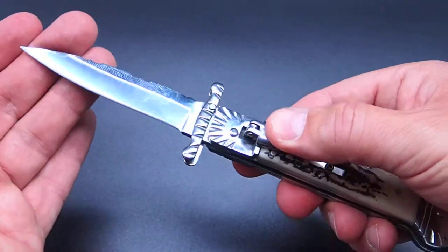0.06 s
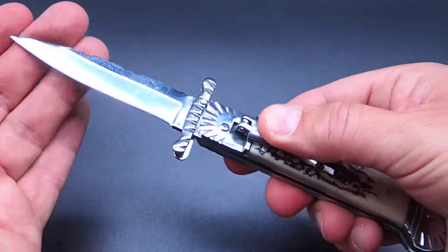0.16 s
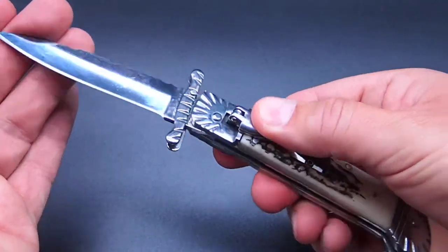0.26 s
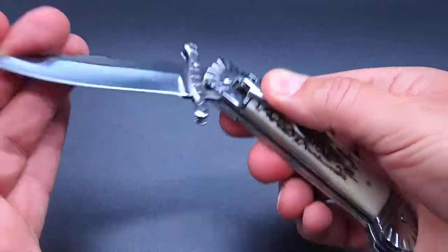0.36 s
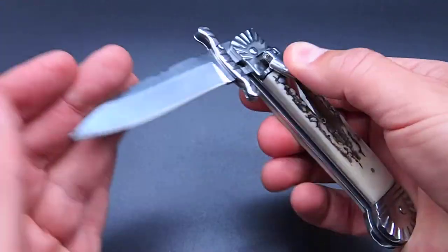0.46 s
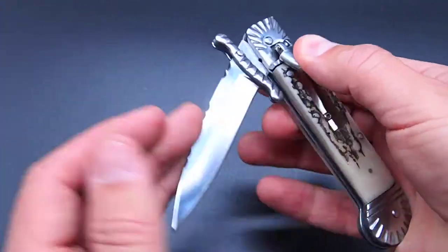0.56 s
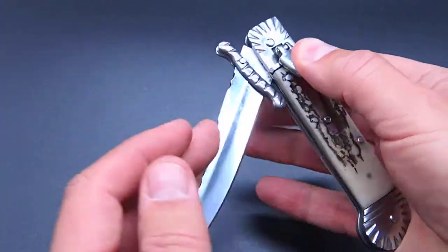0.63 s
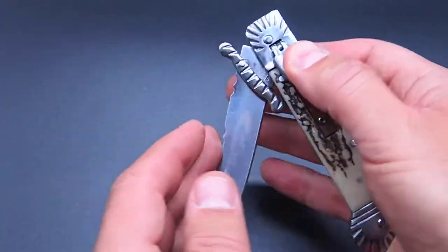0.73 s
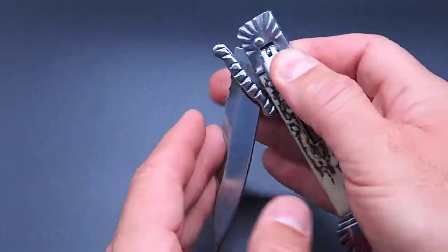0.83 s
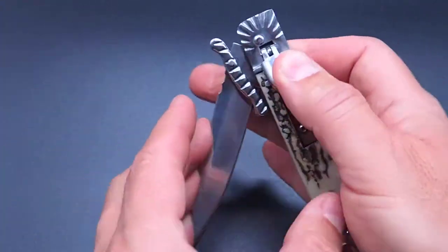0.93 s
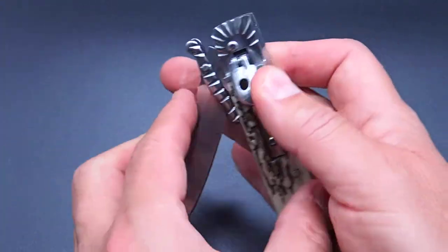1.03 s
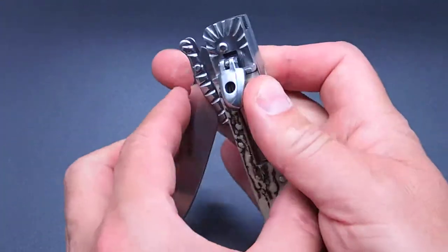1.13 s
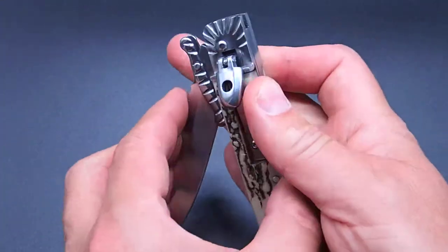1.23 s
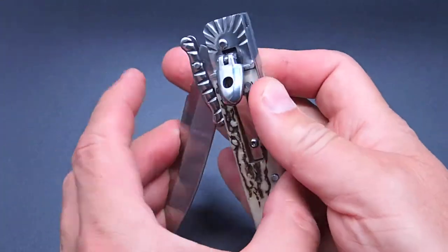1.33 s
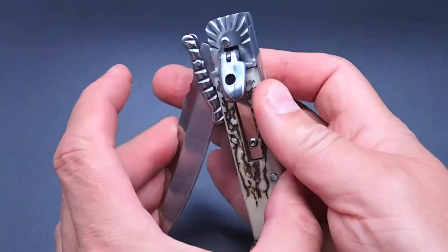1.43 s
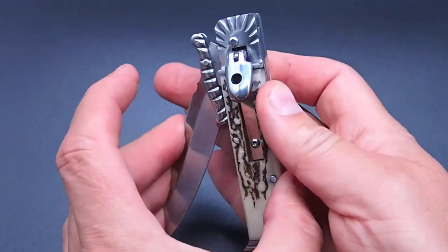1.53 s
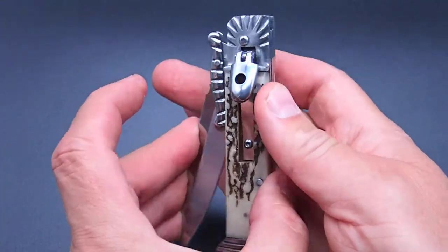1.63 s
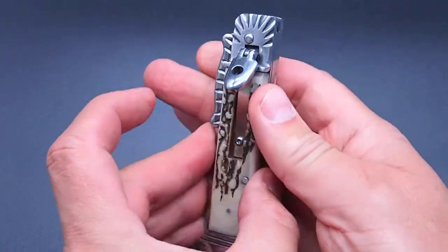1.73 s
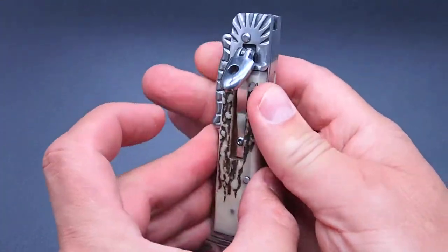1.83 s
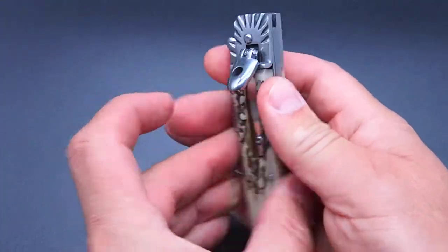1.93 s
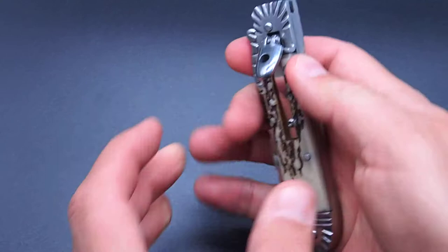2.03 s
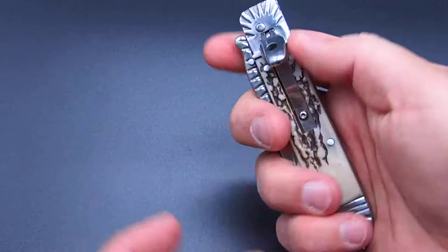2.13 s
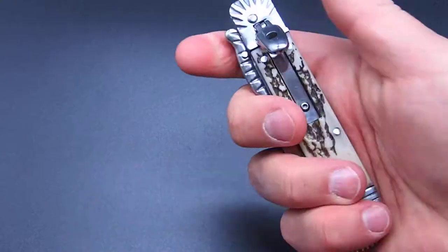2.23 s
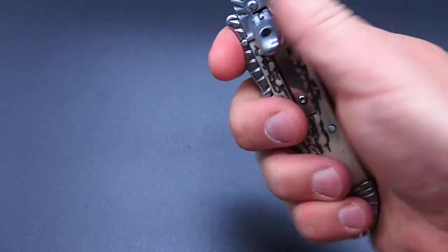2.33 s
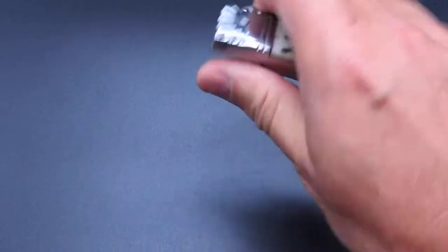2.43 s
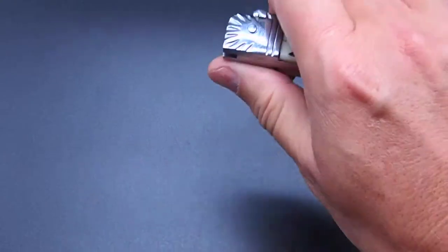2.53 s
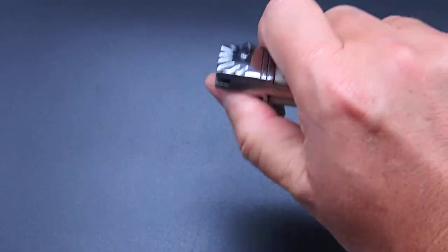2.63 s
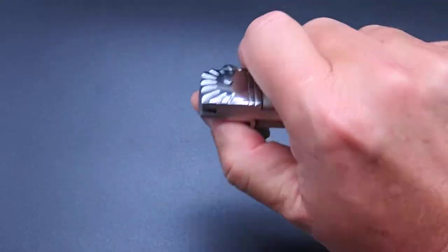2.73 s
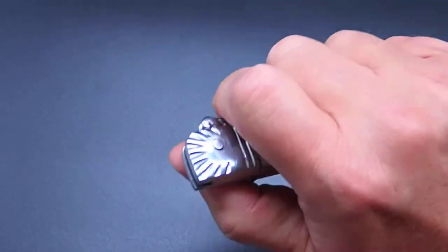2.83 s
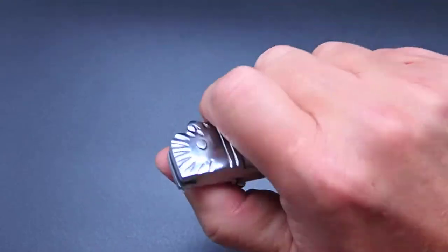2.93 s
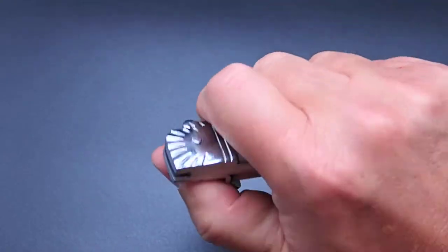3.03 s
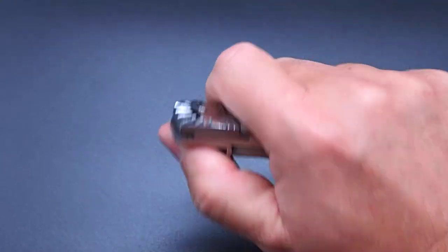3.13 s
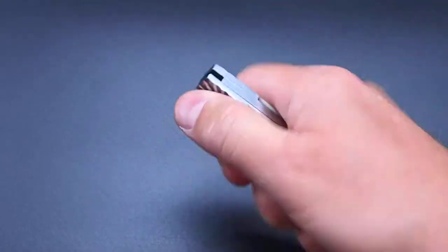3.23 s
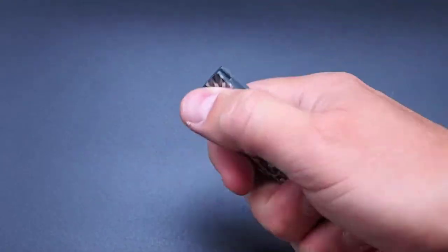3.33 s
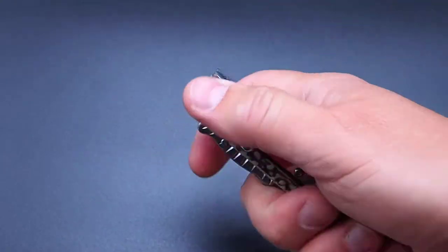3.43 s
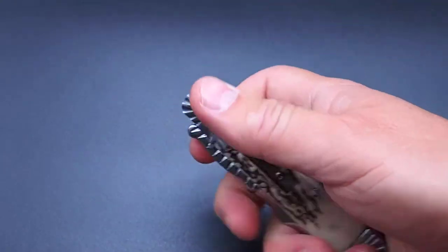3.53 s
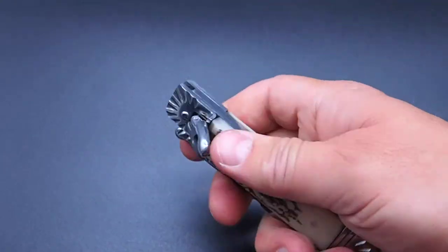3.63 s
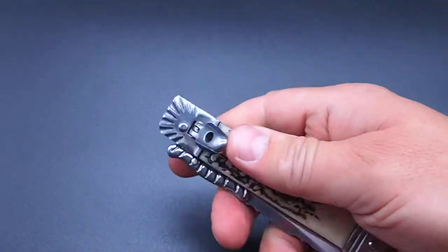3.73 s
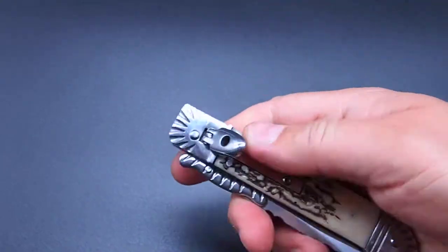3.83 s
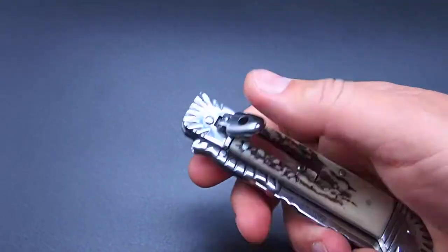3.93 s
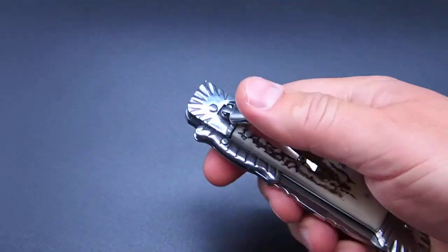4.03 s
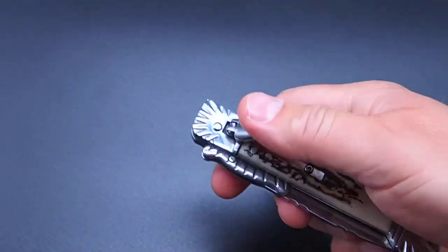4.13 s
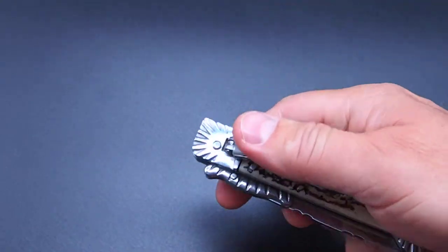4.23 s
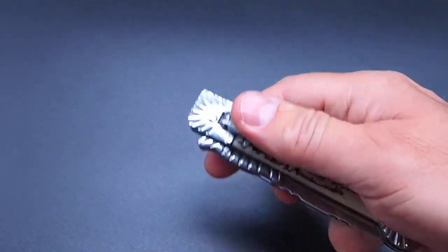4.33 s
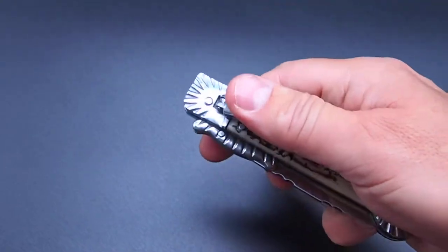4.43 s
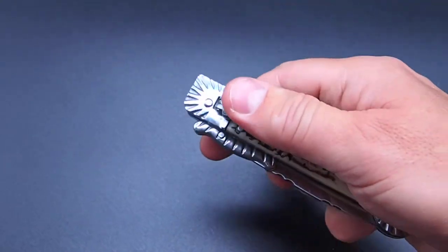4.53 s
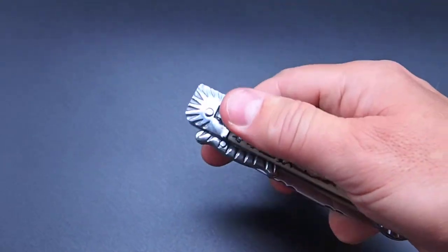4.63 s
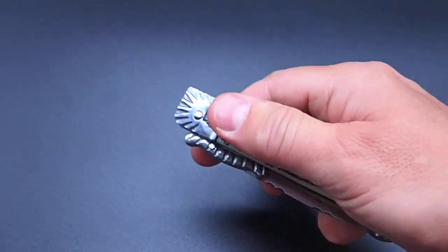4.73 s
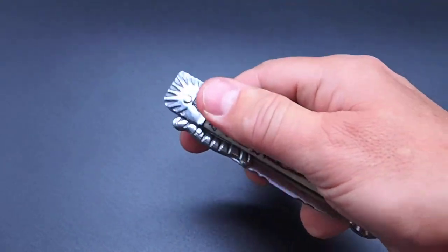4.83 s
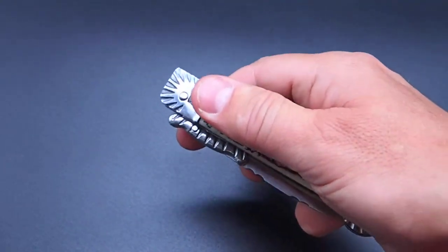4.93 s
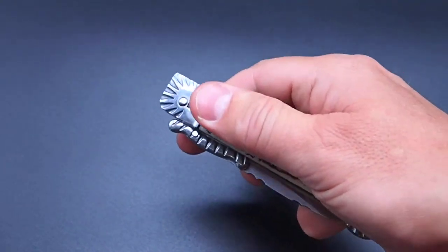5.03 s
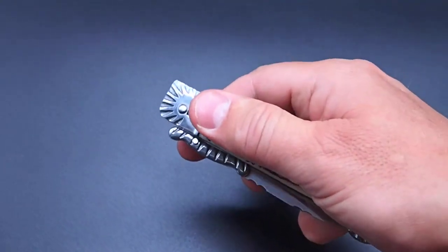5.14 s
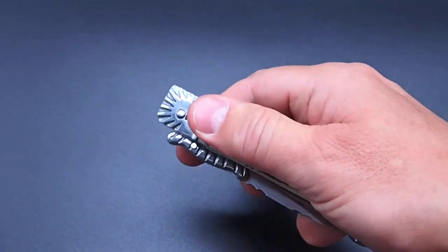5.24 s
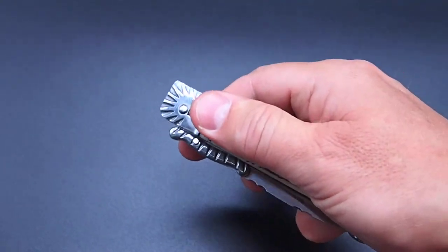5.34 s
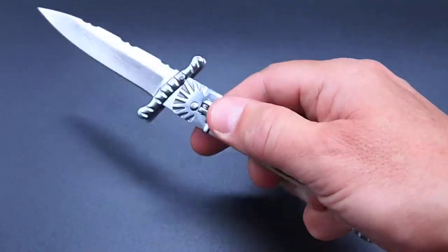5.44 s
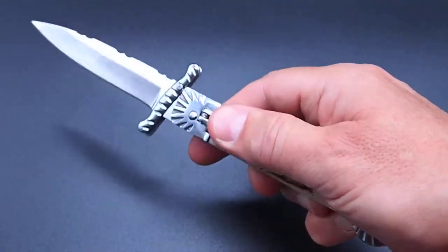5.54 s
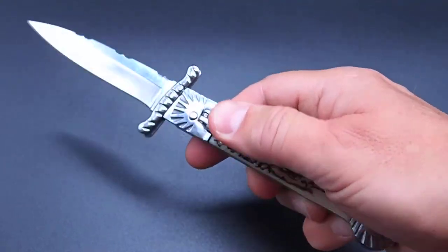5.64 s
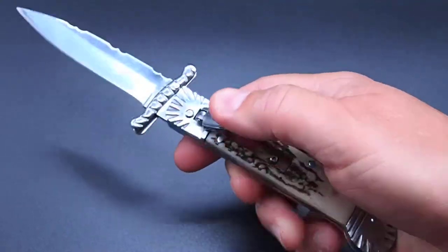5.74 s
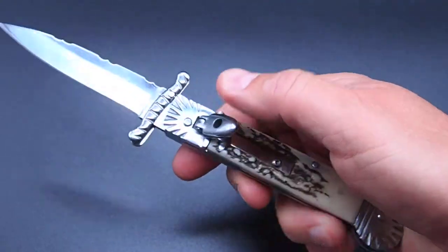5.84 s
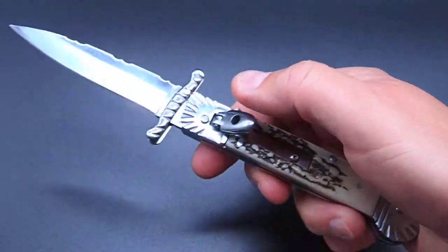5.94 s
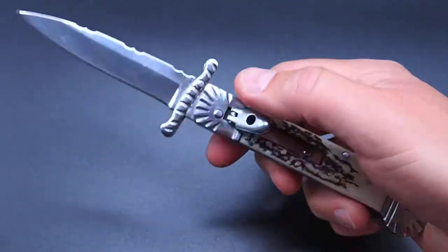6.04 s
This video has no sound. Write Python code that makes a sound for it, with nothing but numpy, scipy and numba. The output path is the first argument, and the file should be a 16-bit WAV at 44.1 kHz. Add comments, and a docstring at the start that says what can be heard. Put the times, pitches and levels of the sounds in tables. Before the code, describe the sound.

Close, dry handling of a small spring knife over quiet room air and steady hiss. Light steel clicks as the lock releases and the blade folds, skin rustling on the handle, a hard bright snap shut, more rubbing and tiny ticks, a small safety click, a pause, then a fierce rattling snap open and a final lever click.

```python
"""Spring-loaded folding knife

A knife is worked by hand close in front of a small camera on a desk, over room air and steady hiss. The lock
lets go, the blade folds and snaps shut, the safety slides, the blade flicks open, the lever drops back. Each
steel blow is a crack, filtered noise chatter and a bank of ringing modes, echoed off the desk. Fingers rub the
handle as grainy noise, a hand on the desk rumbles softly and the pivot squeaks as a high wavering tone. The
camera's gain control ducks everything after the hardest snaps, and its top end is cut off."""
import sys
import numpy as np
from scipy import signal
from scipy.fft import rfft, irfft
from scipy.io import wavfile
from scipy.ndimage import uniform_filter1d
from numba import njit

SR = 44100
rng = np.random.default_rng(int(sys.argv[2]) if len(sys.argv) > 2 else 0)


def unload_wav(signal):
    """Save mono or channel-first audio to the path in sys.argv[1] as 16-bit WAV at rate SR, clipped to [-1, 1]."""
    wavfile.write(
        sys.argv[1],
        SR,
        np.round(np.clip(np.atleast_2d(signal).T, -1, 1) * 32767).astype(np.int16),
    )


N = 267819
TIME = np.arange(N) / SR

# Blows of steel on steel: the lock lets go and the blade folds (0.45-0.72 s); it snaps shut and settles
# (1.71-1.90); loose parts tick as the knife is turned over (2.31-2.48); the safety slides (3.54-3.62);
# the blade springs out and rattles into its lock (5.37-5.44); the lever drops back (5.73).
# Columns: start_s, level_db, first_crack_db, dull_knock_db (3.5 kHz and below), edge_8khz_db,
# sparkle_14khz_db, contact_resonance_hz, resonance_lift_db
STEEL_BLOWS = [ (0.4511, -29.5, 0, -6, -12, -8, 4160, 6.5), (0.4980, -30.5, -12, -1, -3, -5, 5500, 19),
               (0.5033, -26.5, -2.5, -3, -1.5, 19, 4050, 11.5), (0.7222, -30.5, -3, 6.5, 11, 12, 4040, 16),
               (1.7085, -14, -1, -5.5, 5.5, 9.5, 15000, 10.5), (1.7198, -8, 2, -2.5, -1.5, 7.5, 5200, 2.5),
               (1.7286, -16.5, -10, -4, 0, 2, 5230, 11), (1.9037, -48, 2, -6, 7, -1, 5760, 16),
               (2.3122, -44.5, -6, -4, 4, 3, 5500, 2), (2.4750, -43, -10, -13, -7, 0.5, 4500, 1),
               (3.5420, -41, -5, -5, 5, 8, 12500, 11), (3.6169, -27, 0, -17, -3, -3.5, 14900, 21.5),
               (5.3660, -17, -3, 2, -1, 10, 6460, 9), (5.3676, -16, -4, 0, 7, -4, 7460, 25),
               (5.3750, -17.5, 0, 3, -12, -5, 990, 11), (5.3818, -16, -10, 6.5, 16, 3, 5040, 10),
               (5.3848, -14.5, 2, 8.5, 10, 11.5, 10500, 11), (5.3948, -10, -10, 4.5, 9, 12.5, 10000, -1),
               (5.4005, -10.5, -3, -1, -1, 24, 7800, 7), (5.4079, -6.5, -0.5, -2.5, -6, -10, 1090, 9),
               (5.4365, -28, -12, -2, -7, -10, 5400, -1), (5.7303, -21.5, -2.5, 1, 3.5, 9, 5330, 5),
               (5.7358, -26.5, 9, -10, 5, 5, 5300, 8), ]
# Colour of the small steel parts: freq_hz, gain_db
STEEL_COLOUR = [(60, -68), (500, -39.5), (1000, -35), (2200, -27.5), (3600, -22), (4200, -14.5), (4700, -3),
                (5150, 3.5), (5900, -2.5), (6800, -5.5), (7900, -8.5), (9200, -15), (12200, -21),
                (15000, -25), (16500, -22)]
# Ringing modes of the blade and liners: freq_hz, relative_level_db, t60_s
BLADE_MODES = [(2000, -20, 0.076), (2376, -26, 0.076), (2986, -16.5, 0.078), (3260, -15, 0.1),
               (4750, -5, 0.083), (5010, -3.5, 0.083), (5150, -8.5, 0.11), (5100, -12, 0.083),
               (5060, -9.5, .09), (5160, -2, 0.067), (5840, -3, 0.087), (5970, 0, 0.12), (6330, -16, 0.049),
               (6650, -12.5, 0.059), (6950, -28.5, .09), (7330, -13.5, .08), (7720, -9, 0.1),
               (8030, 1, 0.064), (8440, -4, 0.068), (9600, -13, .07), (10300, -14.5, 0.07),
               (12270, -34, 0.07)]
# Colour of skin on the handle: freq_hz, gain_db
SKIN_COLOUR = [(200, -35), (1400, -20.5), (2700, -23.5), (3100, -19), (4200, -25.5), (4650, -7),
               (5500, -0.5), (6800, -12), (7900, -9.5), (9500, -23), (15500, -25)]
# Colour of the room air: freq_hz, relative_density_db (per Hz)
ROOM_COLOUR = [(15, -46), (25, -13.5), (128, -2.5), (267, -2), (369, -2.5), (402, -2.5), (468, -2.5),
               (1260, -6), (1700, -9), (1860, -19), (2070, -12), (2620, -21), (3180, -15), (3950, -24),
               (4300, -31.5), (5590, -48), (9460, -120)]
# Colour of the microphone hiss: freq_hz, relative_density_db (per Hz)
HISS_COLOUR = [(3800, -24), (4400, -11), (4700, 1.5), (5600, -1), (6400, 0), (7100, -1), (8000, 3.5),
               (9400, -4), (12000, -5), (15700, -6)]
# Stereo width of the room air: freq_hz, side_minus_mid_db
ROOM_WIDTH = [(40, -4), (120, -6), (300, -2), (1500, 0), (2500, -0.5), (4000, -10)]
# Strokes of the fingers along the handle: full_speed_at_s, hold_s, level_db, swell_by_60_db_s, release_t60_s
FINGER_STROKES = [ (0.39, 0.115, -42, 0.5, 0.57), (0.85, 0.2, -57.5, 0.7, 0.7),
                  (1.66, 0.036, -55, 0.7, 0.4), (1.94, 0.13, -55.5, 0.5, 0.4),
                  (2.073, 0.067, -40.5, 0.12, 0.78), (2.39, 0.027, -48.5, 0.5, 0.24),
                  (3.52, 0.02, -56.5, 1, 0.3), (3.715, 0.01, -60, 0.2, 0.2), (3.895, 0.015, -60, 0.5, 0.2),
                  (3.97, 0.08, -61, 0.2, 0.4), (5.675, 0.015, -62, 2, 0.25), ]
# Touches of a hand on the desk: full_pressure_at_s, hold_s, level_db
DESK_TOUCHES = [(0.05, 0.2, -71), (0.38, 0.034, -64), (0.78, 0.2, -65), (1.04, 0.17, -61.5)]


def undb(db):
    """Decibels to gain."""
    return 10 ** (np.asarray(db) / 20)


def unit(x):
    """Scale to rms 1."""
    return x / np.sqrt(np.mean(x ** 2))


def decay(t, t60):
    """Exponential fade that loses 60 dB in t60 seconds."""
    return np.exp(-np.log(1000) * t / t60)


def log_hz(size):
    """Log frequency of each spectral bin."""
    return np.log(np.fft.rfftfreq(size, 1 / SR) + 1)


def shape(points, size):
    """Decibels per bin, drawn through (Hz, dB) points on a log frequency axis."""
    hz, db = np.transpose(points)
    return np.interp(log_hz(size), np.log(hz), db)


def colour(x, points):
    """Give a steady sound a spectrum."""
    return irfft(rfft(x) * undb(shape(points, size=N)), N)


def resonate(x, db):
    """Minimum-phase filter with a gain in dB per bin: it rings only after the blow."""
    size = x.shape[-1]
    cepstrum = irfft(np.log(undb(db)))
    # folding the cepstrum forward makes the filter causal
    cepstrum[1:size // 2] *= 2
    cepstrum[size // 2 + 1:] = 0
    return irfft(rfft(x) * np.exp(rfft(cepstrum)))


def pair(size, apart):
    """Left and right noise: a shared part plus a separate part per side, scaled by apart."""
    common, left, right = rng.standard_normal((3, size))
    return unit(common + apart * np.array([left, right]))


def grains(size, grain_db):
    """Uneven gain that jumps to a random level every 32 samples."""
    steps = rng.standard_normal(size // 32 + 1)
    return undb(grain_db * np.repeat(steps, 32)[:size])


def pan(db):
    """Left and right gains for a left-minus-right difference in dB."""
    return undb(np.array([[db], [-db]]) / 2)


def add(out, x, s):
    """Mix x in at time s."""
    start = int(s * SR)
    out[:, start:start + x.shape[1]] += x[:, :N - start]


def gesture(s, hold_s, db, swell_s, t60):
    """Hand movement as gain over time: a swell of 60 dB up to time s, a hold, and a release."""
    before = np.maximum(s - TIME, 0)
    after = np.maximum(TIME - s - hold_s, 0)
    return undb(db) * decay(before, swell_s) * decay(after, t60)


def background(room_db=-58, hiss_db=-53.5, whistle_hz=4810, width_hz=170, whistle_db=-66):
    """Soft room air, wide except in the bass, under steady hiss that whistles faintly on the left."""
    mid, side = colour(rng.standard_normal((2, N)), ROOM_COLOUR)
    side = colour(side, ROOM_WIDTH) / np.std(mid)
    air = unit(mid) + side * np.array([[1], [-1]])
    hiss = unit(colour(pair(N, apart=9.9), HISS_COLOUR))  # nearly independent sides
    out = undb(room_db) * pan(3.16) * air + undb(hiss_db) * pan(2.6) * hiss
    # the whistle is noise in a narrow band
    band = np.exp(-2 * ((np.fft.rfftfreq(N, 1 / SR) - whistle_hz) / width_hz) ** 2)
    whistle = unit(irfft(rfft(rng.standard_normal(N)) * band, N))
    out[0] += undb(whistle_db) * whistle
    return out


def hand_on_desk(hz=100, spread=0.6, swell_s=0.6, t60=0.3):
    """A hand comes down on the desk: only a low rumble comes through."""
    band = np.exp(-((log_hz(N) - np.log(hz)) / spread) ** 2)  # spread in log frequency
    rumble = unit(irfft(rfft(pair(N, apart=0.44)) * band, N))
    pressure = np.max([gesture(*touch, swell_s, t60) for touch in DESK_TOUCHES], axis=0)
    return pressure * pan(1.9) * rumble


def fingers(grain_db=2.0):
    """Skin slips over the carved handle in dense tiny catches, stroke by stroke."""
    catches = grains(N, grain_db) * pair(N, apart=0.33)
    sliding = np.sqrt(sum(gesture(*stroke) ** 2 for stroke in FINGER_STROKES))
    return sliding * pan(1.5) * unit(colour(catches, SKIN_COLOUR))


def blade_ring(t, rise_s=0.00015):
    """The blade's modes swell quickly and fade; each blow starts them at random phases."""
    hz, db, t60 = np.transpose(BLADE_MODES)[:, :, None]
    phase = rng.uniform(0, 2 * np.pi, hz.shape)
    modes = undb(db) * decay(t, t60) * np.sin(2 * np.pi * hz * t + phase)
    return (1 - np.exp(-t / rise_s)) * modes.sum(axis=0)


def blow_force(t, level_db, crack_db, scatter=0.082, chatter_s=0.0043, chatter=0.18, grain_db=3.5,
               late_db=-18, late_t60=0.16, damping=0.25):
    """A one-sample crack, uneven chatter that lasts longer after a harder blow, and a duller room answer."""
    # 86 ms for a full-scale blow, halved for every 65 dB below it
    chatter_t60 = 0.086 * 2 ** (level_db / 65)
    # the chatter holds briefly, then dies in uneven little bounces
    hold = 1 + chatter * np.exp(-((t - chatter_s) / 0.0043) ** 2)
    bounces = unit(grains(len(t), grain_db))
    force = scatter * decay(t, chatter_t60) * hold * bounces * pair(len(t), apart=0.4)
    force[:, 0] += undb(crack_db)
    # the room tail, set relative to the chatter, loses treble in a one-pole low-pass
    late = undb(late_db) * decay(t, late_t60) * pair(len(t), apart=0.55)
    return force + scatter * signal.lfilter([1 - damping], [1, -damping], late)


def contact_tone(size, knock_db, edge_db, sparkle_db, hz, lift_db):
    """Hardness and place of the contact as dB per bin: a tilt plus one resonance."""
    middle_db = (edge_db + sparkle_db) / 2
    points = [(3500, knock_db), (4600, 0.0036), (5600, 0.0038), (8200, edge_db),
              (10500, middle_db), (14000, sparkle_db)]
    resonance = lift_db * np.exp(-((log_hz(size) - np.log(hz)) / 0.12) ** 2)
    return shape(points, size=size) + resonance


def clicks(ring_db=-11, pan_db=1.5, desk_s=0.0025, desk_db=-10, size=8192):
    """Each blow excites the steel parts and the ringing blade, then echoes off the desk."""
    out, t = np.zeros((2, N)), np.arange(size) / SR
    head = slice(0, SR // 100)  # levels are set over the first 10 ms
    for s, level_db, crack_db, *contact in STEEL_BLOWS:
        force = blow_force(t, level_db, crack_db)
        # the contact colours both the snap and the ring
        tone = contact_tone(size, *contact)
        snap = resonate(force, shape(STEEL_COLOUR, size=size) + tone)
        ring = resonate(blade_ring(t), tone)
        blow = snap / np.std(snap[:, head]) + undb(ring_db) * ring / np.std(ring[head])
        blow *= undb(level_db) * pan(pan_db) / np.std(blow[:, head], axis=1, keepdims=True)
        add(out, blow, s)
        # the path by the desk changes a little as the hand moves
        add(out, undb(desk_db) * blow, s + desk_s * rng.uniform(0.8, 1.2))
    return out


def seating(s=1.7199, impulse_db=4.5, soft_hz=2800, lowest_hz=35):
    """The folded blade bottoms in the handle with one short, dull push: a band-passed impulse."""
    push = np.zeros(N)
    push[int(s * SR)] = undb(impulse_db)
    band = signal.butter(2, [lowest_hz, soft_hz], "bandpass", fs=SR, output="sos")
    return signal.sosfilt(band, push)


def squeak(hz=15510, waver_hz=45):
    """The pivot squeaks as the blade swings out: a very high, slightly unsteady tone."""
    waver = unit(uniform_filter1d(rng.standard_normal(N), size=100))
    pitch = hz + waver_hz * waver
    # it swells, holds while the blade turns, then rings off
    swing = gesture(s=5.397, hold_s=0.008, db=-18, swell_s=0.023, t60=0.09)
    return swing * unit(np.sin(2 * np.pi * np.cumsum(pitch) / SR))


def scene(lag_samples=0.78):
    """The knife is a little nearer the right port, so the left hears it a fraction of a sample later."""
    left, right = clicks() + squeak() + fingers()
    delay = np.exp(-2j * np.pi * np.fft.rfftfreq(N) * lag_samples)
    left = irfft(rfft(left) * delay, N)
    return np.array([left, right]) + seating() + hand_on_desk() + background()


@njit
def follow(x, attack, release):
    """Envelope that rises fast and falls slowly."""
    env, e = np.empty(len(x)), 0.
    for i in range(len(x)):
        e += (x[i] - e) * (attack if x[i] > e else release)
        env[i] = e
    return env


def record(dry, ceiling_db=-13.0, attack_s=0.0032, release_s=0.18, top_hz=15900):
    """Gain control turns hard snaps down and recovers slowly; peaks past full scale clip, then the top is cut."""
    loudness = np.abs(dry).max(axis=0)
    env = follow(loudness, 1 / (attack_s * SR), 1 / (release_s * SR))
    held = dry / np.maximum(env / undb(ceiling_db), 1)
    low_pass = signal.ellip(10, 0.2, 70, top_hz, fs=SR, output="sos")
    return signal.sosfilt(low_pass, np.clip(held, -1, 1))


dry = scene()
out = record(dry)
unload_wav(out)
```